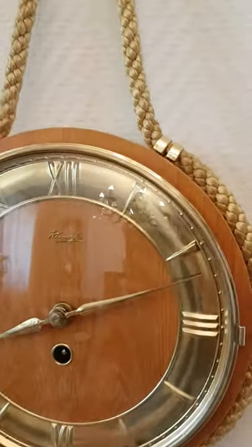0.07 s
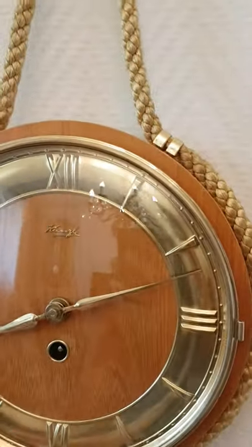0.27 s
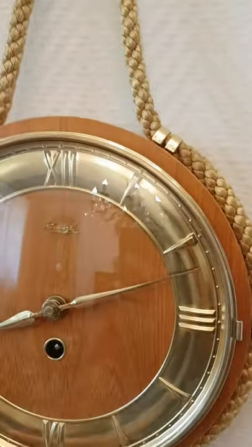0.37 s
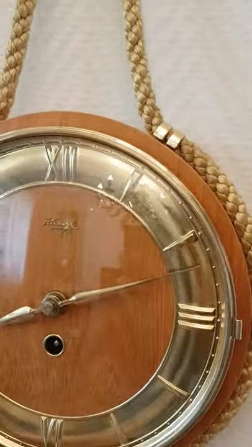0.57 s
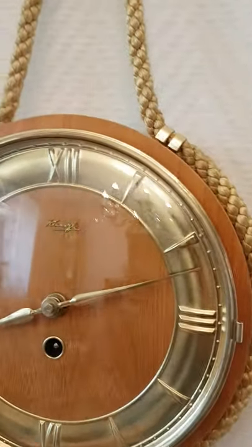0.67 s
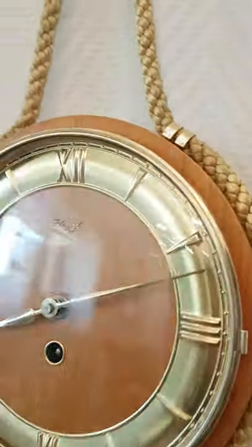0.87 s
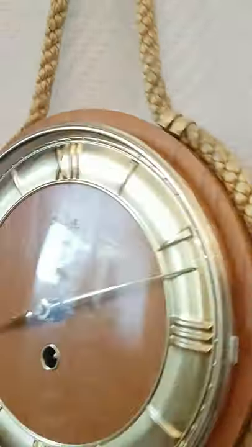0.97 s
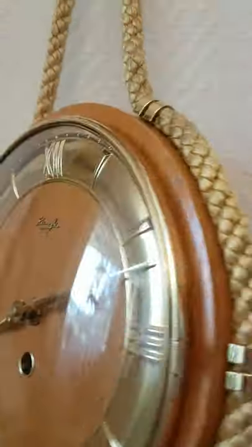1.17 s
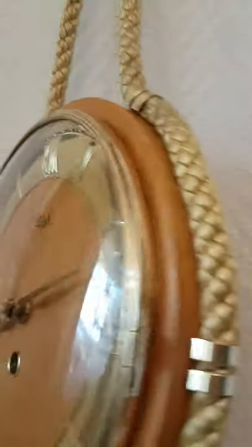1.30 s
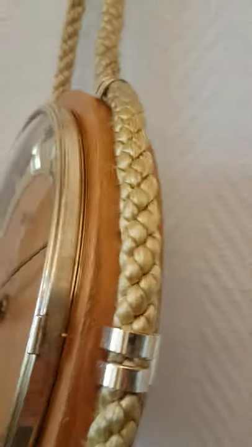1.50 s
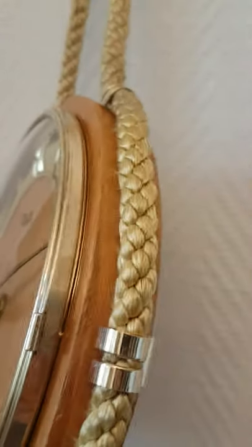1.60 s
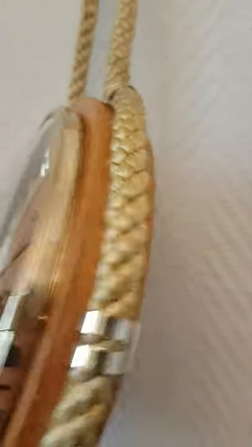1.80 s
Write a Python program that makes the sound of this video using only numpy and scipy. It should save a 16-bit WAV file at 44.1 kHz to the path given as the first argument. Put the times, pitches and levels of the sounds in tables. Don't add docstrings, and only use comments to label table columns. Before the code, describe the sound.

A wall clock ticks faintly and steadily in a quiet room, with soft hollow handling knocks

```python
import sys
import numpy as np
from scipy import signal
from scipy.fft import rfft, irfft
from scipy.io import wavfile
from scipy.ndimage import uniform_filter1d

SR = 44100
rng = np.random.default_rng(int(sys.argv[2]) if len(sys.argv) > 2 else 0)


def field_ratio(decibels):
    return 10 ** (np.asarray(decibels, dtype=float) / 20)


def file_out(sig):
    cols = np.atleast_2d(sig).T
    lim = np.clip(cols, -1, 1)
    pcm = np.round(lim * 32767).astype(np.int16)
    wavfile.write(sys.argv[1], SR, pcm)


N = 81585

STIFF_T60_MAX_S, PANEL_T60_MAX_S = 0.022, 0.04
WIDE_FROM_HZ, WIDE_RAD = 535, 0.94
ALIKE_HZ = 930


def unit(x):
    return x / np.sqrt(np.mean(x ** 2))


def band(x, hz, width_hz):
    return signal.lfilter(*signal.iirpeak(min(hz, 0.45 * SR), hz / width_hz, fs=SR), x)


def walk(rate_hz):
    k = int(SR / rate_hz)
    steps = np.repeat(rng.standard_normal(N // k + 1), k)
    return 0.56 * uniform_filter1d(uniform_filter1d(steps, k), k)[:N]


def ring(modes, push_s, scatter_db, crack=None, bright_db=0, longest_s=STIFF_T60_MAX_S):
    t = np.arange(6000) / SR
    f_hz, level_db, t60_s = np.hsplit(np.array(modes, float), 3)
    chance_db, chance_hz, chance_rad = np.hsplit(rng.standard_normal((len(modes), 3)), 3)
    hz = f_hz * (1 + 0.013 * chance_hz)
    turn = WIDE_RAD * np.clip(hz / WIDE_FROM_HZ - 1, 0, 1) * chance_rad
    decay = 1000.0 ** (-t / np.clip(t60_s, STIFF_T60_MAX_S / 4, longest_s))
    size = field_ratio(level_db + scatter_db * chance_db) * decay
    y = np.array([(size * np.sin(2 * np.pi * hz * t + sign * turn / 2)).sum(0) for sign in (1, -1)])
    y = y / np.abs(y).max()
    if crack:
        crack_db, crack_t60_s, *crack_hz = crack
        hiss = signal.lfilter(*signal.butter(2, crack_hz, "band", fs=SR), rng.standard_normal(y.shape))
        y = y + field_ratio(crack_db) * unit(hiss) / 2 * 1000.0 ** (-t / crack_t60_s)
    treble = signal.lfilter(*signal.butter(2, 5000, "high", fs=SR), y)
    y = y + (field_ratio(bright_db) - 1) * treble
    y = y * np.clip(t / push_s, 0, 1)
    return y / np.abs(y.mean(0)).max()


def add(out, s, x, pan_db):
    at = int(s * SR)
    gains = field_ratio(np.array([[pan_db], [-pan_db]]) / 2)
    out[:, at:at + x.shape[-1]] += (gains * x)[:, :N - at]


def spread(mid, side, alike_hz, bass_wide=0.099):
    treble = signal.lfilter(*signal.butter(1, alike_hz, "high", fs=SR), side)
    side = bass_wide * side + (1 - bass_wide) * treble
    return np.array([mid + side, mid - side])


# [t/s, level/dB, brightness/dB, L-R/dB]
BEATS = [
    (0.177, -58.5, 2, 4),
    (0.3971, -56.5, 1, 1),
    (0.621, -57.5, 3.5, 3),
    (0.843, -55, -5, 1),
    (1.0674, -56.5, 4, 3),
    (1.2875, -48.5, -12, -0.5),
    (1.5094, -62.5, 7, 9),
    (1.732, -51, -9, -7.5),
]
# [f/Hz, level/dB, t60/s]
BRASS_MODES = [(2180, -35, 0.01), (2916, 0.5, .014), (3096, 2, 0.031), (3290, -2, 0.027),
               (3710, -6.5, 0.012), (4280, -5.5, 0.019), (4570, -8.5, 0.018), (6170, -23, 0.017),
               (7530, -9, 0.015), (9870, -9, 0.013), (10840, -10.5, 0.022)]
UNLOCK_S, UNLOCK_DB = 0.003, -14
DROP_S, DROP_DB = 0.0037, -1


def clock():
    out = np.zeros((2, N))
    for s, db, bright_db, pan_db in BEATS:
        for late_s, part_db in ((-UNLOCK_S, UNLOCK_DB), (0, 0), (DROP_S, DROP_DB)):
            click = ring(BRASS_MODES, 0.00046, 3, (-6, 0.011, 2500, 11500), bright_db)
            add(out, s + late_s, field_ratio(db + part_db) * click, pan_db)
    return out


# [t/s, level/dB, f/Hz, hardness/dB, L-R/dB]
KNOCK_HITS = [(0.159, -43, 603, -14.5, 2), (0.212, -47, 557, -3, -2), (.216, -40.5, 571, -7, 4),
              (.236, -37, 680, -24, -2), (0.2482, -19.5, 564.5, -18.5, 2.5), (.2585, -39, 530, -7, -6),
              (.263, -35.5, 510, -16, 4), (.278, -33, 618, -33, 3), (0.364, -58, 590, -9, 11),
              (.5165, -51.5, 566, -17, 0.5), (.536, -51, 566, -16, 6), (0.753, -52, 687, -12, .1),
              (.762, -54.5, 656, -14, .1), (1.0109, -44.5, 1180, 2, -3), (1.0143, -29.5, 661, -24, 2),
              (1.0182, -35, 411, -11.5, 3.5), (1.31, -42, 665, -11, 3.5), (1.316, -47, 513, -4, 8),
              (1.328, -43, 565, -9, 5), (1.481, -56, 720, -3, 9)]
# [f/pitch, level/dB, t60/s]
PANEL_MODES = [(0.722, -11.5, 0.045), (0.962, 2.5, 0.035), (1.078, 2, 0.027), (1.45, -3, 0.017),
               (2.1, -8.5, 0.028)]
# [f/Hz, level/dB, t60/s]
EDGE_MODES = [(1260, -0.5, 0.029), (1640, -4.5, 0.025), (2206, -2.5, 0.029), (2610, 2.5, 0.015),
              (3080, -0.5, 0.03), (3580, -13, 0.013)]
PUSH_CYCLES, EDGE_PAN_DB = 0.96, -3.5
BOOM_HZ, BOOM_DB, BOOM_T60_S, BOOM_RISE_S = 67.5, -32, 0.3, 0.055


def knocks():
    out, t = np.zeros((2, N)), np.arange(SR // 2) / SR
    boom = np.sin(2 * np.pi * BOOM_HZ * t) * 1000.0 ** (-t / BOOM_T60_S)
    boom = boom * np.clip(t / BOOM_RISE_S, 0, 1) ** 2
    for s, db, hz, hard_db, pan_db in KNOCK_HITS:
        modes = [(ratio * hz, mode_db, t60_s) for ratio, mode_db, t60_s in PANEL_MODES]
        panel = ring(modes, PUSH_CYCLES / hz, 1.15, longest_s=PANEL_T60_MAX_S)
        edge = ring(EDGE_MODES, 0.00082, 3.1, (-15.5, 0.035, 1100, 3600))
        add(out, s, field_ratio(db) * panel, pan_db)
        add(out, s, field_ratio(db + hard_db) * edge, pan_db + EDGE_PAN_DB)
        add(out, s, field_ratio(db + BOOM_DB) * boom, 0.1)
    return out


# [t/s, level/dB, f/Hz, t60/s]
GRIP_THUMPS = [
    (0.251, -56.5, 191, 0.066),
    (0.534, -63, 160, 0.15),
    (0.766, -67, 156, 0.17),
    (1.016, -60.5, 207, .08),
    (1.05, -58, 193, 0.15),
    (1.309, -61, 221, 0.098),
    (1.44, -68, 112.5, 0.16),
    (1.531, -65, 123.6, 0.17),
    (.455, -71, 68, 0.12),
]


def thumps():
    out = np.zeros((2, N))
    for s, db, hz, t60_s in GRIP_THUMPS:
        thump = ring([(hz, 0, t60_s), (1.3 * hz, -8, t60_s)], 1.8 / hz, 0, longest_s=1)
        add(out, s, field_ratio(db) * thump, 0.6)
    return out


# [t/s, level/dB, brightness/dB, L-R/dB]
CASE_SNAPS = [
    (1.0108, -51, 6, 4),
    (1.3065, -37, -11.5, -3),
    (1.3092, -43.5, -9, 13.5),
    (1.4799, -48.5, -4, -1.5),
    (1.481, -46.5, -7, -2),
]
# [f/Hz, level/dB, t60/s]
PLASTIC_MODES = [(1250, 3, 0.028), (1544, 5, 0.043), (1930, -22, 0.019), (2400, 0, 0.032),
                 (2735, 6.5, 0.021), (2880, 1, .018), (3130, -2, 0.019), (3520, 0, 0.031), (4368, 3, 0.028),
                 (4940, 1, 0.0053), (6600, -14, 0.0058), (8210, -4.5, 0.019)]


def snaps():
    out = np.zeros((2, N))
    for s, db, bright_db, pan_db in CASE_SNAPS:
        click = ring(PLASTIC_MODES, 0.0003, 3, (-9, 0.015, 1500, 15000), bright_db)
        add(out, s, field_ratio(db) * click, pan_db)
    return out


# [start t/s, length/s, level/dB, centre f/Hz]
CLOTH_MOVES = [
    (0.171, 0.12, -67.5, 2250),
    (0.353, 0.072, -69, 2400),
    (.64, 0.066, -77.5, 2450),
    (0.687, 0.098, -69.5, 700),
    (1.054, 0.11, -72, 2400),
    (1.185, 0.054, -75, 2760),
    (1.427, .14, -65.5, 600),
    (1.487, 0.11, -71, 1900),
]
GRAINS_PER_S, GRAIN_DB = 2000, 3.5


def rustle():
    out, t = 0, np.arange(N) / SR
    for s, length_s, db, hz in CLOTH_MOVES:
        u = rng.random((2, 3, N))
        hit = u[:, 0] < GRAINS_PER_S / SR
        clicks = hit * np.sign(u[:, 1] - 0.5) * field_ratio(-GRAIN_DB * np.log(u[:, 2] + 0.02))
        mid, side = (unit(band(c, hz, 0.3 * hz)) for c in clicks)
        swell = np.sin(np.pi * np.clip((t - s) / length_s, 0, 1))
        out = out + field_ratio(db) * spread(mid, side, ALIKE_HZ) * swell
    return out


# [f/Hz, t60/s]
ROOM_DECAY = [(125, 0.41), (250, 0.49), (500, 0.18), (1000, 0.3), (2000, 0.43), (4000, 0.17), (8000, 0.067),
              (15000, 0.37)]
ROOM_RISE_S = 0.0027


def diffuse():
    t, tail = np.arange(SR // 2) / SR, 0
    for hz, t60_s in ROOM_DECAY:
        octave = unit(band(rng.standard_normal(len(t)), hz, 0.97 * hz))
        tail = tail + octave * np.sqrt(hz / t60_s) * 1000.0 ** (-t / t60_s)
    return tail * (1 - np.exp(-t / ROOM_RISE_S))


def room(dry):
    mid, side = diffuse(), diffuse()
    tail = spread(mid, side, ALIKE_HZ) / np.sqrt(np.sum(mid ** 2))
    return signal.fftconvolve(dry.mean(0, keepdims=True), tail, axes=1)[:, :N]


# [f/Hz, level/dB per Hz]
FLOOR_SPECTRUM = [(25, -22), (70, -9.5), (300, -7), (1200, -13.5), (3300, -20), (7000, -31), (10000, -31.5),
                  (14000, -25.5)]
# [f/Hz, width/Hz, level/dB]
HOUSE_DRONES = [(68, 9.6, -81.5), (104.5, 24, -94), (379, 90, -78.5)]
FLOOR_DB, FLOOR_WIDE_DB, FLOOR_ALIKE_HZ, FLOOR_BASS_WIDE = -69, 0.5, 700, 0.42
FLICKER_DB, SWELL_DB = 0.2, -0.7


def floor():
    f = np.fft.rfftfreq(N, 1 / SR) + 1
    hz, db = np.array(FLOOR_SPECTRUM).T
    shape = field_ratio(np.interp(np.log(f), np.log(hz), db))
    both, swell = 0, walk(1.9)
    for k in range(20):
        part = shape * np.cos(np.pi / 2 * np.clip(2 * np.log2(f / 25) - k, -1, 1))
        noise = irfft(rfft(rng.standard_normal((2, N))) * part, N)
        slow = np.clip(1 - k / 16, 0, 1)
        both = both + noise * field_ratio(slow * (SWELL_DB * swell + FLICKER_DB * walk(5.3)))
    mid, side = both * field_ratio(FLOOR_DB) / np.sqrt(np.mean(both ** 2))
    for drone_hz, width_hz, drone_db in HOUSE_DRONES:
        drone = band(band(rng.standard_normal(N), drone_hz, width_hz), drone_hz, width_hz)
        mid = mid + field_ratio(drone_db) * unit(drone)
    return spread(mid, field_ratio(FLOOR_WIDE_DB) * side, FLOOR_ALIKE_HZ, FLOOR_BASS_WIDE)


TICK_WET_DB, KNOCK_WET_DB, SNAP_WET_DB = -7, -7.5, -4.5


def scene():
    tick, knock, snap = clock(), knocks() + thumps(), snaps()
    wet = room(field_ratio(TICK_WET_DB) * tick) + room(field_ratio(KNOCK_WET_DB) * knock) + room(field_ratio(SNAP_WET_DB) * snap)
    return tick + knock + snap + wet + rustle() + floor()


def roll_off(x):
    return signal.sosfilt(signal.butter(12, 16250, fs=SR, output="sos"), x)


TOP_HZ, OFFSET = 15800, -0.0004


def record(dry):
    cut = signal.sosfilt(signal.ellip(10, 0.3, 60, TOP_HZ, fs=SR, output="sos"), dry)
    return roll_off(cut + OFFSET)


dry = scene()
out = record(dry)
file_out(out)
```